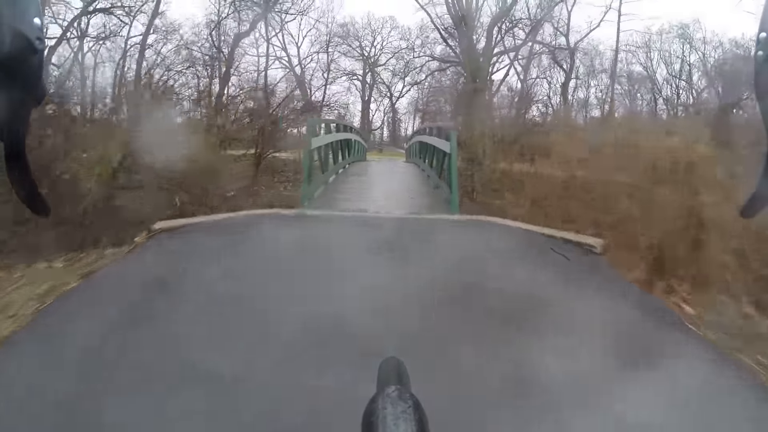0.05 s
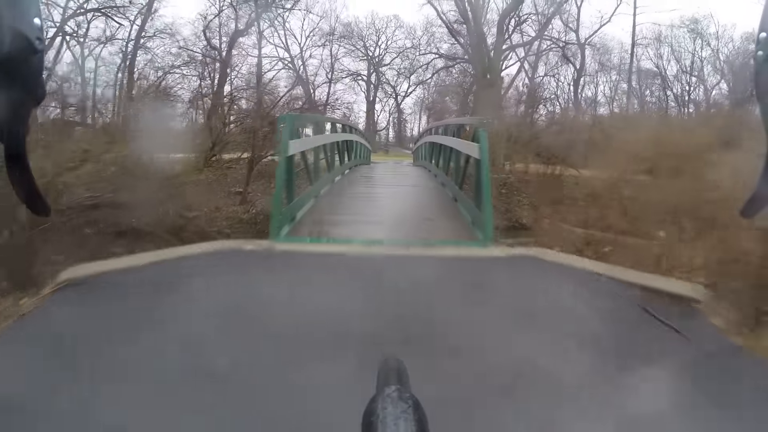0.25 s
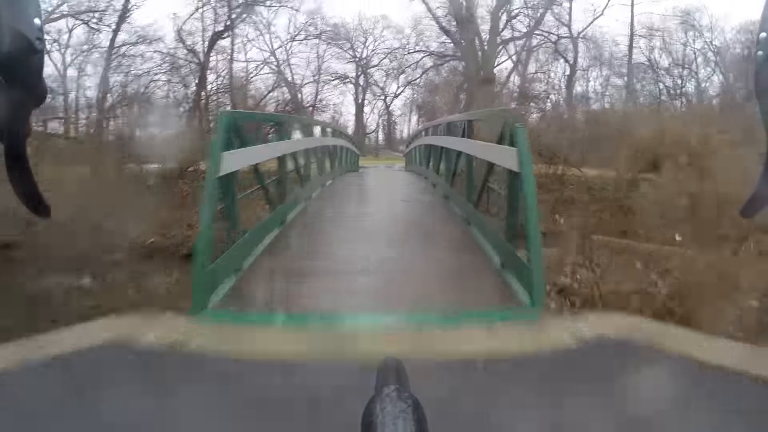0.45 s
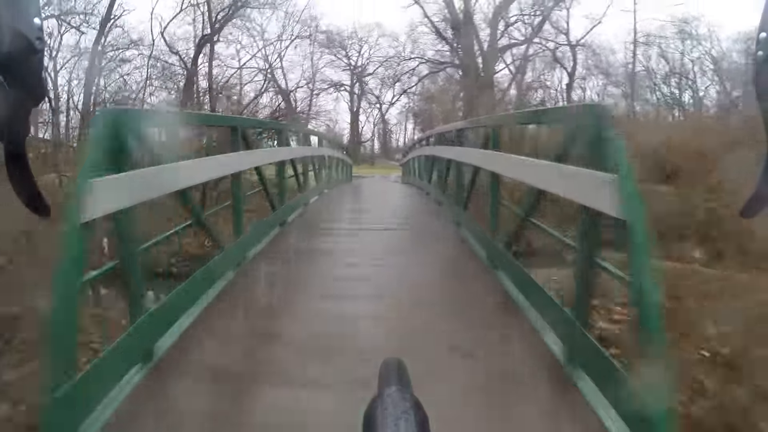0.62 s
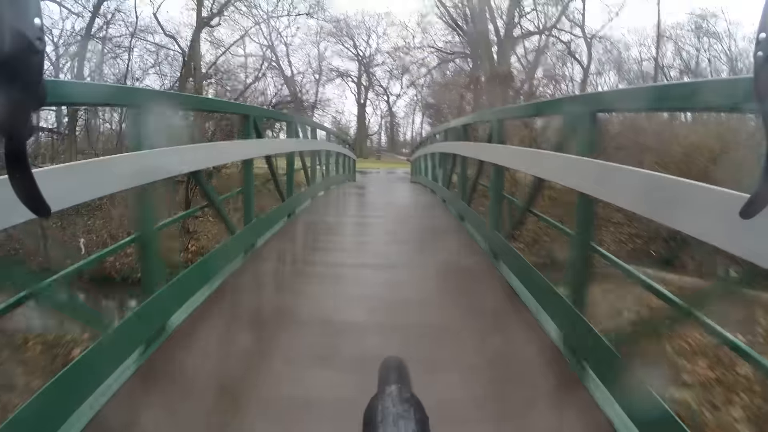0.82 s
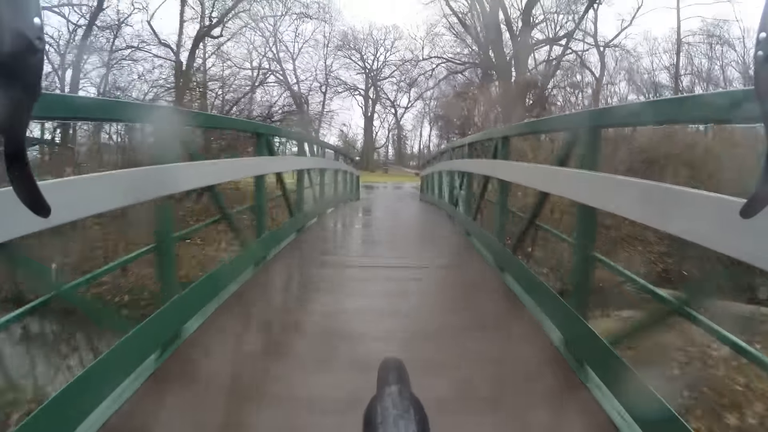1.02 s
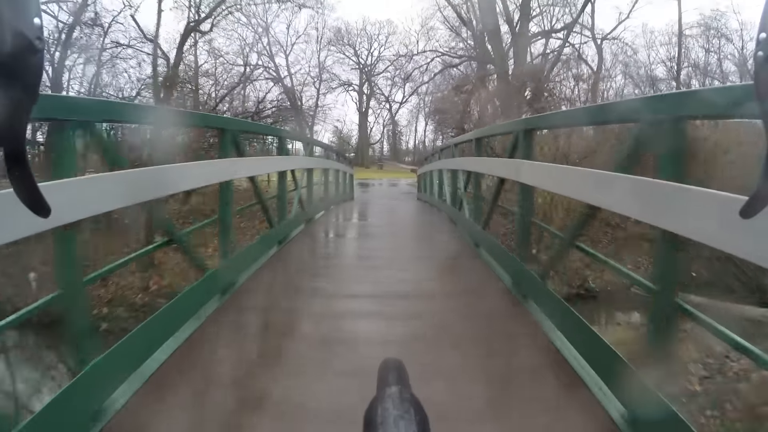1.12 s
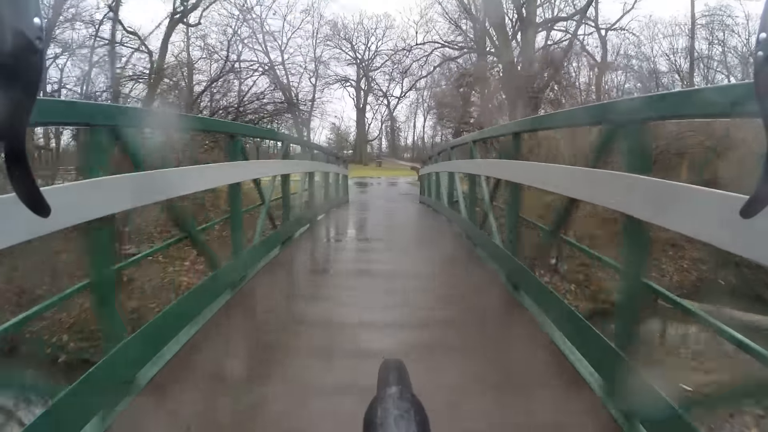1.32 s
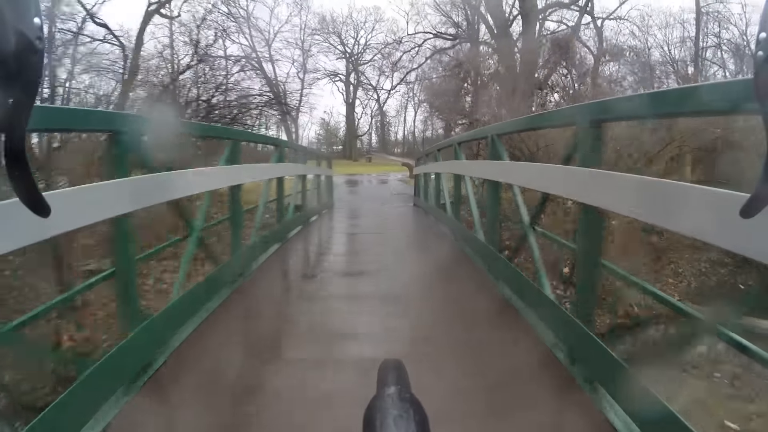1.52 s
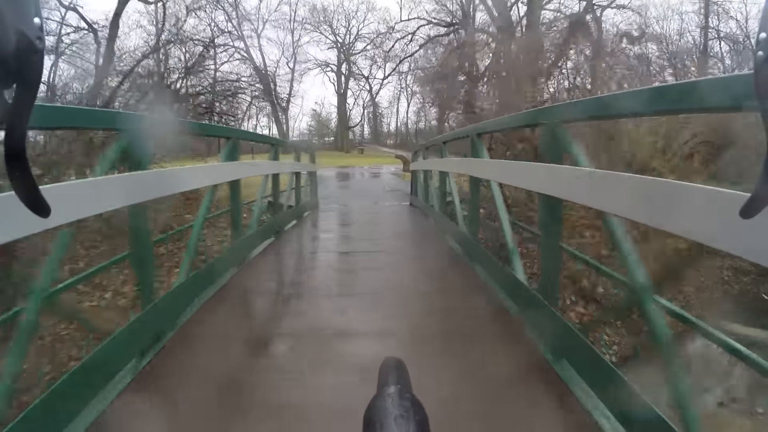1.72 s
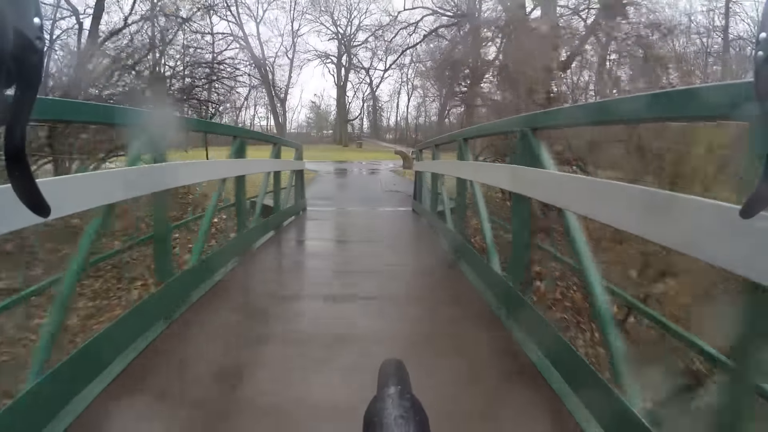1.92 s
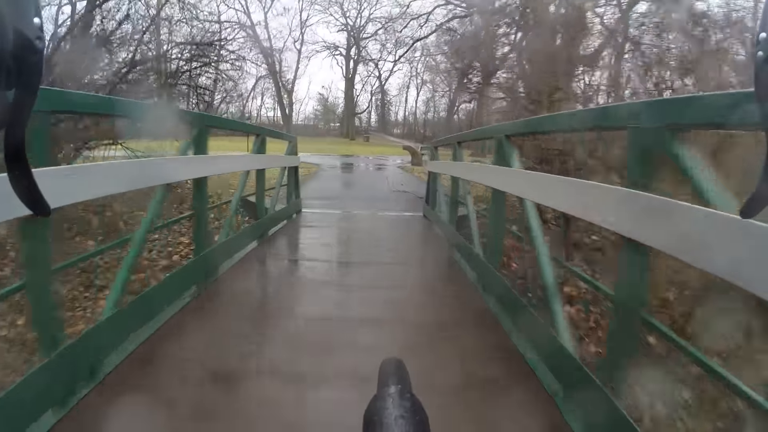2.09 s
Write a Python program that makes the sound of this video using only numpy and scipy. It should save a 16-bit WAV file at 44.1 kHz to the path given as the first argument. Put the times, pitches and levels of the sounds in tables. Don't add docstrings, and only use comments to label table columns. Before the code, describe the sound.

A coasting bicycle, close through a clamped microphone outdoors: quick, even freewheel ticks over quiet wet tyre hiss and faint frame hum. At about 0.7-0.8 s the front wheel slams onto a plank bridge with deep thumps and rattling; the rear follows around 0.95-1.0 s. Ticks and hiss dip near 1.2 s, then recover, now uneven and smeared, among low booms. More bumps and clatter come at 1.35-1.5, 1.8 and 1.95-2.05 s.

```python
import sys
import numpy as np
from scipy import signal
from scipy.io import wavfile
from scipy.ndimage import uniform_filter1d

SR = 44100
rng = np.random.default_rng(int(sys.argv[2]) if len(sys.argv) > 2 else 0)


def linear_from_db(decibels):
    return 10 ** (np.asarray(decibels, float) / 20)


def materialize(psi):
    bounded = np.clip(np.atleast_2d(psi).T, -1, 1)
    quanta = np.round(bounded * 32767).astype(np.int16)
    wavfile.write(sys.argv[1], SR, quanta)


N = 94815
T = np.arange(N) / SR


def curve(table):
    return np.interp(T, *np.array(table).T[:2])


def unit(x):
    return x / np.sqrt(np.mean(x ** 2))


def band(x, hz, width):
    return signal.lfilter(*signal.iirpeak(min(hz, 0.45 * SR), hz / width, fs=SR), x)


def ring(x, hz, t60):
    pole = np.exp(2j * np.pi * hz / SR - np.log(1000) / (t60 * SR))
    return signal.lfilter([1], [1, -pole], x).imag


def walk(rate):
    hold = int(SR / rate)
    steps = np.repeat(rng.standard_normal(N // hold + 1), hold)
    slewed = uniform_filter1d(uniform_filter1d(steps, hold), hold)[:N]
    return unit(slewed - uniform_filter1d(slewed, size=5 * hold))


def after(start, t60):
    age = np.maximum(T - start, 0)
    return (1 - np.exp(-age / 0.00021)) * linear_from_db(-60 * age / max(t60, 0.005))


def pawl_burst(stretch):
    rise_s, fall_s = 0.0016 * stretch, 0.0022 * stretch
    age = T[T < 0.03]
    return (1 - np.exp(-age / rise_s)) ** 2 * np.exp(-age / fall_s)


def freewheel():
    # t/s, teeth passed
    teeth = [(.008, 0), (.1745, 13), (.2453, 19), (.4737, 36), (.5942, 46), (.6582, 51), (.7101, 55),
             (.7255, 56), (.7585, 58), (.7734, 59), (.8054, 61), (.8388, 63), (.9277, 69), (.984, 73),
             (1.0189, 75), (1.0548, 77), (1.1271, 81), (1.1645, 83), (1.2025, 85), (1.2354, 87),
             (1.2721, 89), (1.3142, 92), (1.3327, 93), (1.3816, 96), (1.4414, 100), (1.5013, 104),
             (1.5596, 107), (1.6075, 110), (1.6435, 112), (1.6726, 114), (1.7318, 118), (1.8131, 123),
             (1.8425, 125), (1.8804, 127), (1.9484, 131), (1.9787, 133), (2.0161, 135), (2.0431, 137),
             (2.1049, 141), (2.136, 143)]
    # f/Hz, level on asphalt/dB, level on deck/dB, t60/s
    hub = [(10190, 4.5, 4.5, 0.005), (10720, 4.5, -1, 0.0067), (11410, 5.5, 0.5, 0.0043),
           (12070, -1, -2, 0.0042), (12830, 2, -4, 0.0061), (14000, -6, -6, .003), (9350, 1, 4, 0.0017),
           (8260, -19, -15, 0.00073), (6260, 4, -1.5, 0.0064), (5500, 6, -3.5, 0.0065),
           (4500, 11, 0.5, 0.0051), (3600, 13, 7.5, 0.0052), (2533, 15.5, 7, 0.0049),
           (1500, 6, -20, 0.0071)]
    # t/s, level/dB
    pawls = [(0, 0.5), (.74, 0), (.8, -6.5), (.93, -1.5), (1.02, -5.5), (1.1, 2), (1.15, -3), (1.195, 6),
             (1.27, -1), (1.39, -2), (1.52, 0.5), (1.58, 2.5), (1.64, 2), (1.72, -2.5), (1.81, 2),
             (1.86, 0.5), (1.91, 3), (2.15, -1)]
    rear_on_deck_s = 0.845

    times, counts = np.array(teeth).T
    at = np.interp(np.arange(counts[-1] + 1), counts, times)
    luck = rng.standard_normal((len(at), 2 + len(hub)))
    deck = at > rear_on_deck_s
    jitter_s = np.where(deck, 0.00071, 0.00015)
    at = at + luck[:, 0] * jitter_s - 0.0016
    force_db = np.where(deck, 2.5, 1.2) * luck[:, 1]

    chatter = rng.standard_normal(N)
    out = 0
    for k, (hz, asphalt_db, deck_db, t60) in enumerate(hub):
        ticks = np.zeros(N)
        ticks[(at * SR).astype(int)] = linear_from_db(np.where(deck, deck_db, asphalt_db) - luck[:, 2 + k] + force_db)
        crisp = signal.fftconvolve(ticks * (T <= rear_on_deck_s), pawl_burst(0.82))
        smeared = signal.fftconvolve(ticks * (T > rear_on_deck_s), pawl_burst(1.6))
        envelope = (crisp + smeared)[:N]
        out = out + band(ring(envelope * chatter, hz, t60), hz, hz / 3)
    return linear_from_db(-2 + curve(pawls)) * unit(out)


def spray():
    # f/Hz, level per Hz/dB
    hiss = [(470, -32), (800, -4), (1640, -9), (2500, -6), (6330, -14.5), (7170, -13.5), (10400, -11),
            (13200, -15), (15400, -59)]
    drops_per_s, drop_db, flicker_db, tilt_db = 480, -1, 2, -10

    freqs, levels = np.array(hiss).T
    drops = (rng.random(N) < drops_per_s / SR) * rng.standard_normal(N)
    drops = drops * linear_from_db(2.8 * rng.exponential(size=N))
    drops = linear_from_db(drop_db) * unit(drops)
    shared_db = walk(90)
    out = 0
    for hz in 900 * 2 ** np.arange(0, 4.2, 1 / 3):
        water = rng.standard_normal(N) * linear_from_db(flicker_db * walk(25.72) + shared_db) + drops
        db = np.interp(np.log(hz), np.log(freqs), levels) + tilt_db * max(np.log2(hz / 4500), 0)
        out = out + linear_from_db(db) * band(band(water, hz, hz / 3), hz, hz / 3)
    return linear_from_db(-0.5) * out / np.sqrt(np.mean(band(out, 2750, 3750) ** 2))


def frame():
    # t/s, level/dB
    shake = [(0.0, -30), (0.66, -30), (0.76, -12.5), (0.87, -19.5), (0.92, -12.5), (1.33, -25), (1.36, -21),
             (1.48, -18.5), (1.52, -19.5), (1.72, -15.5), (1.85, -15), (1.93, -19.5), (1.97, -13),
             (2.08, -15.5), (2.15, -18.5)]
    # f/Hz, width/Hz, level on asphalt/dB, level on deck/dB
    modes = [(25.4, 23, -1.5, -22), (45, 18.3, -8.5, 2), (79, 21.4, -2.5, -9), (104, 35.7, -0.5, -5.5),
             (139.8, 31.4, -20, -16), (216.6, 26, 0, -12), (270, 70, -14, -16.5), (361.8, 21.2, -6, -23),
             (417, 77, -10.5, -22), (503, 47, -6, -20.5), (732.4, 83, -6, -22.5), (834, 303, -8, -24)]
    boom_hz, boom_cap_db = 90, -17

    on_deck = np.clip((T - 0.672) / 0.11, 0, 1)
    shake_db = curve(shake)
    grit_db = 1.5 * walk(44.79)
    out = 0
    for hz, width, asphalt_db, deck_db in modes:
        drive_db = np.minimum(shake_db, boom_cap_db) if hz < boom_hz else shake_db + grit_db
        mode_db = asphalt_db + (deck_db - asphalt_db) * on_deck + 0.5 * walk(10.9)
        hum = band(band(rng.standard_normal(N), hz, 1.7 * width), hz, 1.7 * width)
        out = out + linear_from_db(drive_db - 3.5 + mode_db) * unit(hum)
    return out


def knocks():
    # t/s, level/dB, f/Hz, t60/s
    hits = [(0.03, -31.5, 712, 0.14), (0.085, -26.5, 734, 0.24), (0.22, -31, 718, 0.33),
            (0.54, -27, 746, 0.08), (1.225, -23, 206, 0.1), (1.295, -26, 482, 0.083),
            (0.112, -25, 361, 0.64), (0.155, -29, 219, 0.27), (0.2, -25.5, 358.5, 0.43),
            (0.262, -24, 220.4, 0.66), (0.5, -20.5, 353, 0.19), (0.535, -21.5, 213, 0.27),
            (0.59, -23, 370.7, 0.29), (0.625, -16.5, 239.7, 0.18), (.732, -15, 780, 0.022),
            (.763, -9, 460, 0.05), (.763, -11.5, 640, 0.04), (.782, -13, 477, 0.051),
            (.785, -30, 150, 0.036), (.815, -19, 475, 0.06), (0.95, -7, 413, 0.015),
            (0.967, -6, 225, 0.075), (.985, -15.5, 488, 0.053), (.989, -14, 638, 0.066),
            (0.99, -22, 336, .03), (1.0035, -8.5, 226, 0.13), (1.046, -24, 259, 0.042),
            (1.451, -17.5, 541, 0.048), (1.512, -25.5, 794, 0.04), (1.533, -26.5, 502, 0.21),
            (1.665, -17.5, 147, 0.075), (1.862, -11.5, 124, 0.092), (2.06, -15, 300, 0.035),
            (1.731, -12.5, 270, 0.027), (1.772, -14.5, 226, 0.081), (1.8, -10.5, 232, 0.056),
            (1.976, -7.5, 185, 0.04), (2.027, -6.5, 207, 0.013), (2.03, -16, 417, 0.099),
            (2.04, -4, 224, 0.027)]
    return sum(linear_from_db(db) * after(s, t60) * np.sin(2 * np.pi * hz * (T - s)) for s, db, hz, t60 in hits)


def jolts():
    # t/s, level/dB, sway f/Hz, t60/s, direction (signed strength)
    pushes = [(0.696, -10, 100, 0.08, 0.91), (0.732, -2, 60, 0.04, 1), (0.736, -6, 30.6, 0.18, -1.03),
              (0.754, 5, 40, 0.036, 0.97), (0.781, 1.5, 111, 0.096, 0.68), (0.805, 0.5, 36, 0.098, 0.62),
              (.903, -5, 52.8, 0.32, 0.87), (0.937, -2, 41, 0.12, -1.1), (0.962, 2, 100, 0.039, -1.1),
              (0.9886, 1, 128, 0.021, 0.48), (1.065, -13.5, 43, 0.41, 1), (1.355, -3.5, 54, 0.24, -0.56),
              (1.512, -7, 40.5, 0.47, -0.97), (1.577, -7, 43, 0.17, 1), (1.786, -3, 45, 0.32, 0.79),
              (1.832, 0, 40, 0.18, -1.03), (1.95, 0.5, 35.6, 0.047, -1.04), (1.964, -3, 54.8, 0.32, 0.73),
              (1.995, -7.5, 52, 0.22, -1.1), (2.038, -10, 91, 0.14, 1), (2.112, -2, 41.5, 0.16, 0.82)]
    return sum(way * linear_from_db(db) * after(s, t60) * np.sin(2 * np.pi * hz * (T - s))
               for s, db, hz, t60, way in pushes)


def rattle(noise, start, db, hz, t60):
    fade = after(start, t60)
    width = hz / 1.5
    burst = fade * band(band(band(noise, hz, hz), hz, width), hz, width)
    return linear_from_db(db - 11) * burst * np.sqrt(np.sum(fade ** 2) / np.sum(burst ** 2))


def rattles():
    # t/s, level/dB, centre f/Hz, t60/s
    clatters = [(0.733, -23, 1060, 0.052), (0.737, -22, 3400, 0.051), (0.7627, -11, 4000, 0.026),
                (.757, -20, 3000, 0.018), (.783, -22, 3800, .03), (.793, -26.5, 6500, .02),
                (0.799, -25.5, 3400, 0.034), (0.8274, -18, 4200, 0.018), (0.8269, -28, 7500, 0.0092),
                (0.909, -32, 2400, .05), (0.923, -25.5, 4120, 0.092), (0.9356, -17.5, 4160, 0.026),
                (0.94, -30, 6530, 0.05), (0.967, -25, 3540, 0.053), (0.973, -28, 3000, 0.035),
                (0.949, -28, 1500, 0.05), (.984, -19, 1930, 0.085), (.976, -26, 1210, 0.06),
                (.986, -13.5, 1090, 0.064), (1.016, -31, 4000, 0.048), (0.985, -26, 5500, 0.071),
                (1.044, -29, 3570, 0.065), (1.4495, -17.5, 2500, 0.023), (1.45, -17, 1080, 0.037),
                (1.4515, -21, 1820, 0.037), (1.5341, -27, 3070, 0.048), (1.727, -25, 2180, 0.023),
                (1.765, -20, 890, 0.032), (1.767, -27, 3600, 0.033), (1.809, -23, 3600, 0.065),
                (1.811, -26, 6400, 0.034), (1.944, -24, 2700, 0.042), (1.9623, -16, 4500, 0.032),
                (1.975, -20, 2980, .03), (2.027, -21, 3600, 0.044), (2.029, -12, 1280, 0.024),
                (2.046, -27, 3240, 0.045), (2.058, -23, 2600, 0.027), (2.084, -23, 2600, 0.024)]
    noise = rng.standard_normal(N) * linear_from_db(1.8 * walk(700))
    return sum(rattle(noise, *row) for row in clatters)


def scene():
    # t/s, level/dB
    gain = [(0.0, -41), (0.6, -41), (0.81, -42.5), (0.95, -42), (1.07, -46.5), (1.2, -52), (1.35, -44.5),
            (1.6, -45), (1.74, -42.5), (1.92, -41.5), (2.15, -42)]
    airborne = linear_from_db(curve(gain)) * (freewheel() + spray())
    clamp = frame() + knocks() + jolts() + rattles()
    return (airborne + clamp)[None]


def low_pass(x):
    return signal.sosfilt(signal.butter(12, 15600, fs=SR, output="sos"), x)


def record(dry):
    ceiling = 1.4
    x = signal.sosfilt(signal.butter(2, 17, "high", fs=SR, output="sos"), dry)
    x = ceiling * np.tanh(x / ceiling)
    x = signal.sosfilt(signal.butter(10, 14500, fs=SR, output="sos"), x)
    return low_pass(x)


dry = scene()
out = record(dry)
materialize(out)
```